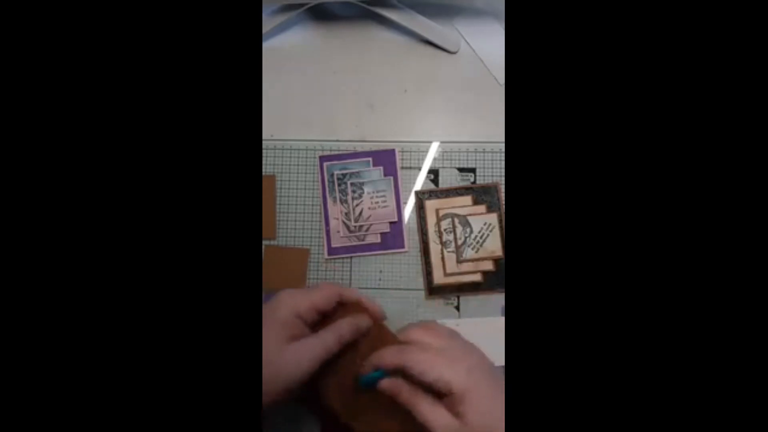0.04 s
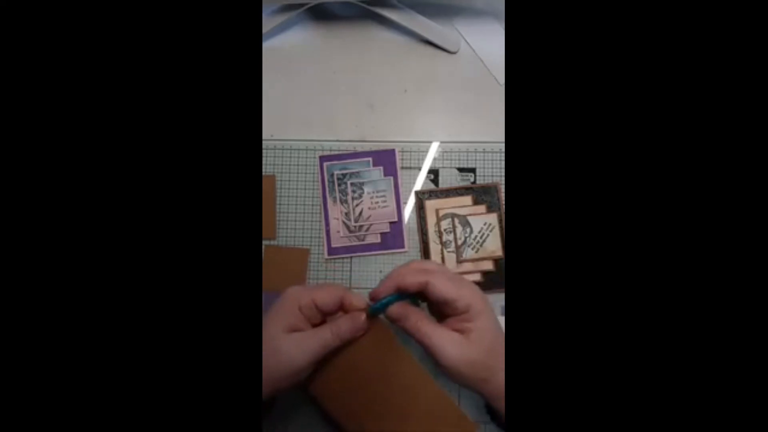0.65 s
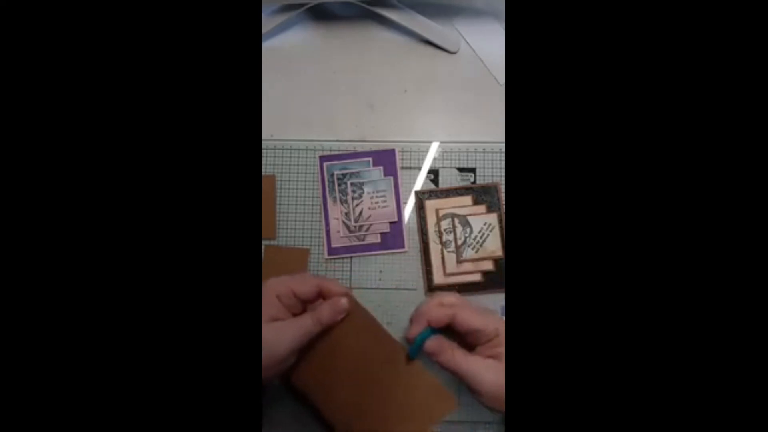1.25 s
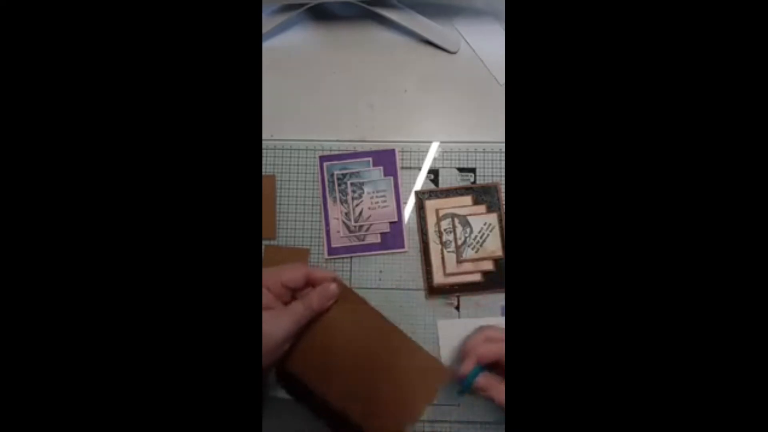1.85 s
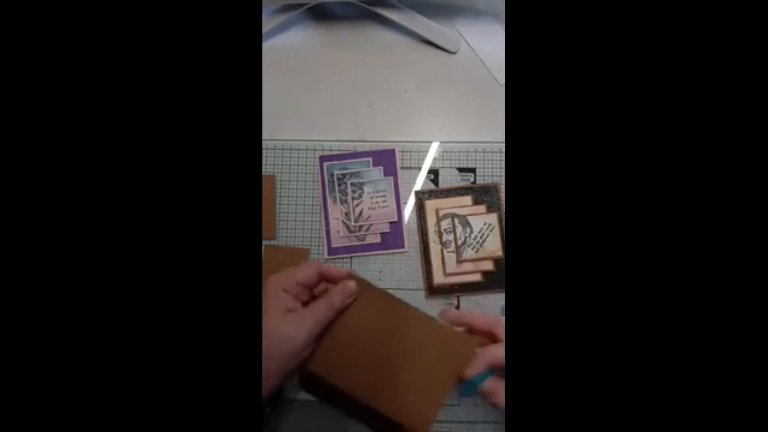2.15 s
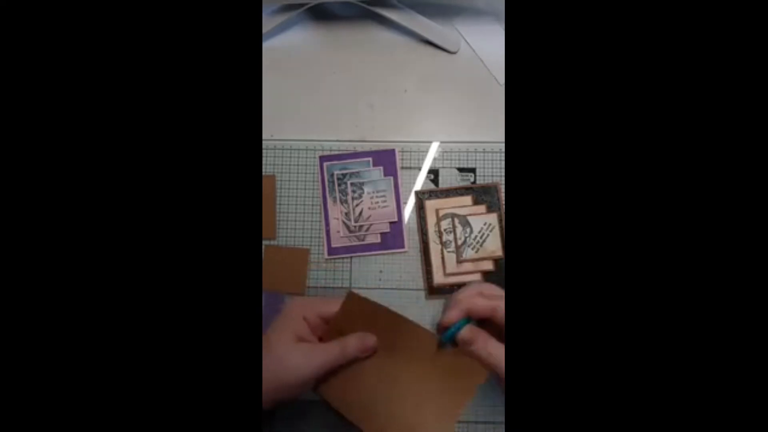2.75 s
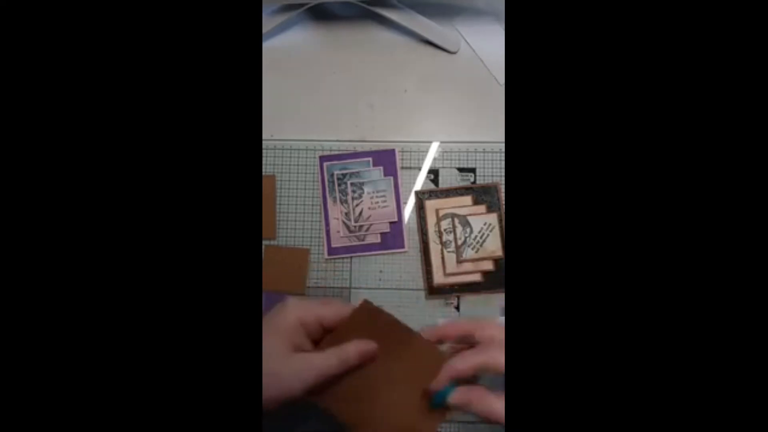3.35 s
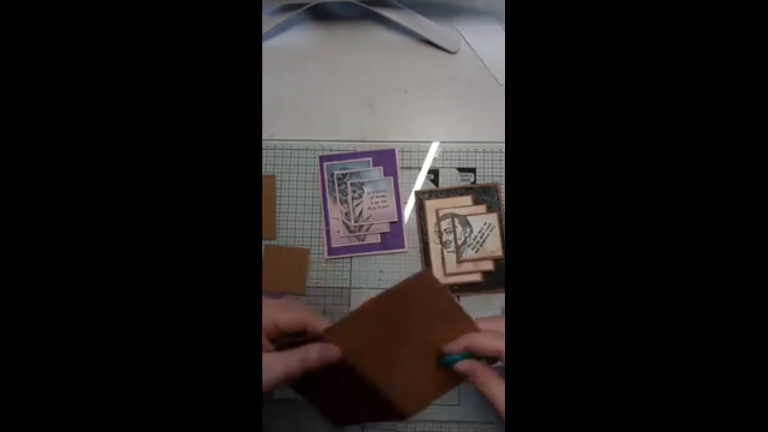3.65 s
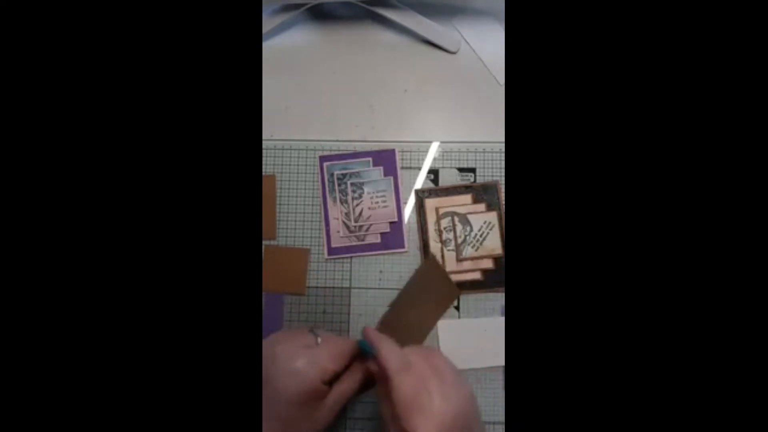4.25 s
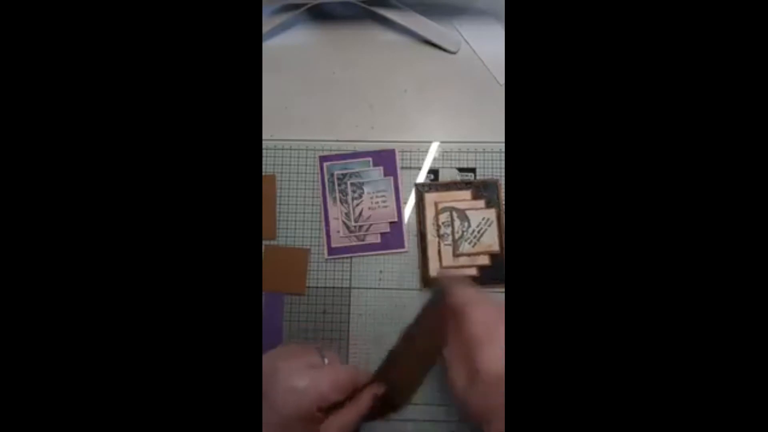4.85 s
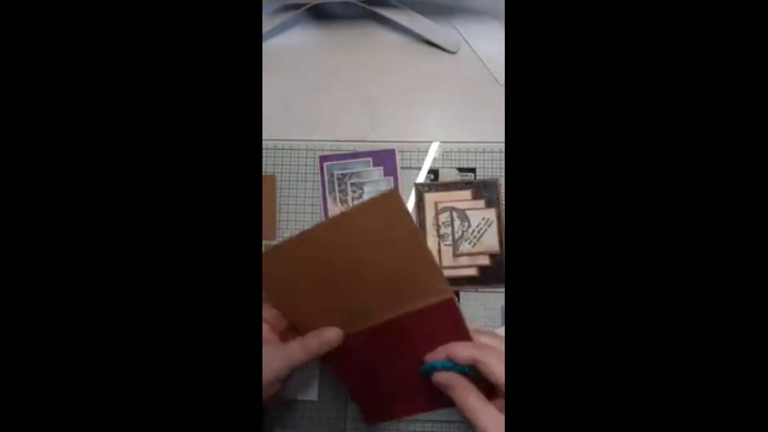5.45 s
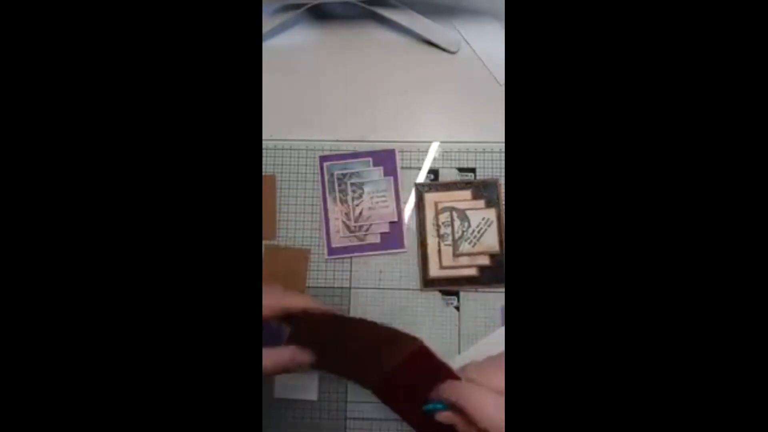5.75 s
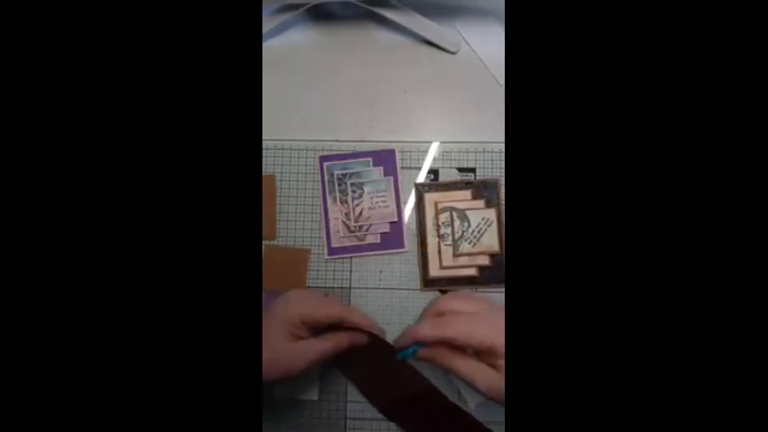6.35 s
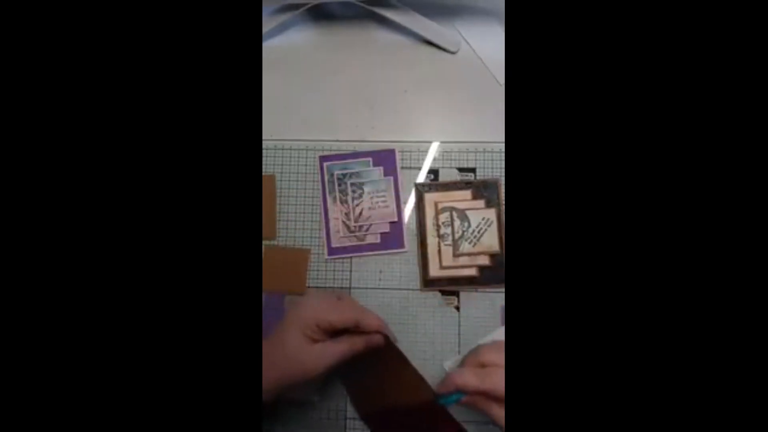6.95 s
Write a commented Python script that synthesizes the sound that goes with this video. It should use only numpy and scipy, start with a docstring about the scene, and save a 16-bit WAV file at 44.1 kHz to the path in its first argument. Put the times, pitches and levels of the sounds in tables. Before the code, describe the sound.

A small blade rasps along the edge of a card in short strokes, with paper sliding, tapping and brief squeaks between them.

```python
"""A craft table in a small room, one close microphone over faint room air.
A paper distresser's blade rasps along the edge of a folded card in short strokes: it catches and
tears fibres at an uneven rate, and the card radiates each slip. Between strokes the card hisses
through the fingers and over the mat, squeaks briefly, and is tapped and flicked."""
import sys
import numpy as np
from scipy import signal
from scipy.fft import rfft, irfft, next_fast_len
from scipy.io import wavfile
from scipy.ndimage import map_coordinates

SR = 44100
rng = np.random.default_rng(int(sys.argv[2]) if len(sys.argv) > 2 else 0)


def master(y):
    """Save y as 16-bit WAV."""
    cut = np.clip(np.atleast_2d(y).T, -1, 1)
    pcm = np.round(cut * 32767)  # scale
    wavfile.write(sys.argv[1], SR, pcm.astype(np.int16))


N = 312603
TIME = np.arange(N) / SR
EDGE_DB = 20  # level spanned by the rise or fall of a stroke or slide


def amp(db):
    """Decibels to gain."""
    return 10 ** (np.asarray(db) / 20)


def unit(x):
    """x at rms 1."""
    return x / np.sqrt(np.mean(x ** 2) + 1e-20)


def along(points, hz):
    """(f/Hz, value) points read on a log frequency axis."""
    f, v = np.transpose(points)
    return np.interp(np.log(hz + 1), np.log(f + 1), v)


def band(hz, lo_hz, hi_hz, order=8):
    """Gain of a band with soft edges."""
    return ((1 + (lo_hz / (hz + 1)) ** order) * (1 + (hz / hi_hz) ** order)) ** -.5


def wobble(rate):
    """A smooth random curve, rate knots a second."""
    return map_coordinates(rng.standard_normal(int(N * rate / SR) + 4), [TIME * rate])


def coloured(x, gain):
    """x through a minimum-phase filter whose gain is a function of frequency."""
    n = x.shape[-1]
    m = 2 * next_fast_len(n // 2 + SR // 16)
    hz = np.fft.rfftfreq(m, 1 / SR)
    cepstrum = irfft(np.log(np.maximum(gain(hz), 1e-6)))
    cepstrum[1:m // 2] *= 2
    cepstrum[m // 2 + 1:] = 0
    return irfft(rfft(x, m) * np.exp(rfft(cepstrum)), m)[..., :n]


def air():
    """Room tone: a faint steady noise behind everything."""
    # spectrum of the room tone: f/Hz, relative level/dB
    spectrum = [(20, -25), (40, -6), (62, -3.5), (110, 5), (200, -12), (380, -1), (550, -10.5), (850, -6.5),
                (1300, -17.5), (2600, -14.5), (4500, -11.5), (8000, -19.5), (14000, -11.5)]
    return amp(-62.5) * unit(coloured(rng.standard_normal(N), lambda hz: amp(along(spectrum, hz))))


def room(x, early_db, early_t60, tail_db):
    """The table and near things scatter the sound at once; the walls answer with a short tail."""
    # reverberation time of the room: f/Hz, t60/s
    decay_times = [(150, 0.51), (450, 0.25), (1000, 0.32), (2800, 0.29), (7000, .28), (14000, 0.19)]
    hz, t, noise = signal.stft(rng.standard_normal(SR // 2), SR, nperseg=256)
    decay = amp(-60 * t / along(decay_times, hz)[:, None])
    tail = signal.istft(noise * decay, SR, nperseg=256)[1]
    t = np.arange(len(tail)) / SR
    tail *= np.clip(t / .012, 0, 1)
    early = rng.standard_normal(len(t)) * amp(-60 * t / early_t60) * (t > .002)
    response = amp(early_db) * early / np.linalg.norm(early) + amp(tail_db) * tail / np.linalg.norm(tail)
    return x + signal.fftconvolve(x, response)[:N]


def card(hz):
    """Gain of the held card: resonances standing on its broad colour."""
    # broad colour of the card: f/Hz, gain/dB
    colour = [(30, -31.5), (100, -16), (240, -4), (450, -0.5), (900, 0), (1080, -11), (1400, -5),
              (2700, -11), (3100, -10.5), (4700, -11.5), (6800, -18), (15000, -26)]
    # its resonances: f/Hz, width/Hz, peak relative to the colour/dB
    modes = [(450, 330, -10), (583, 38, -3), (850, 52, -11), (1590, 73, -18.5), (2650, 240, 2.5),
             (3827, 150, 2), (4610, 160, -2), (6550, 550, -1)]
    peaks = sum(amp(db) / (1 + (2 * (hz - centre) / width) ** 2) for centre, width, db in modes)
    return amp(along(colour, hz)) * (1 + peaks)


def bent(x, delay_s):
    """Bending waves in card are dispersive: treble arrives first, 1 kHz after delay_s, bass later."""
    m = next_fast_len(len(x) + SR // 16)
    phase = 4 * np.pi * delay_s * np.sqrt(1000 * np.fft.rfftfreq(m, 1 / SR))
    return irfft(rfft(x, m) * np.exp(-1j * phase), m)[:len(x)]


def gripped(x):
    """Each grip leaves part of the sheet free to ring at two pitches; the fingers shade its treble."""
    # grips: from t/s, to t/s, low ring f/Hz, boost/dB, high ring f/Hz, boost/dB, treble gain/dB
    grips = [(0.137, 0.214, 440, 4.5, 4670, 2.5, 1.5), (1.005, 1.26, 620, 1.5, 2570, 3.5, -1),
             (1.318, 1.467, 830, 3, 2630, 4, -0.5), (1.526, 1.893, 740, 2, 2480, 5, 1.5),
             (1.914, 1.957, 961, 6, 1384, 14, 3), (2.248, 2.274, 247, 2, 494, 21, -1),
             (2.505, 2.523, 238, 12, 480, 3, -4), (2.787, 2.85, 601.5, 0.5, 1900, 9, -3.5),
             (2.876, 3.19, 493, 6, 1670, 7, 2), (4.245, 4.569, 388.1, 6.5, 1376, 6, -2),
             (4.61, 4.84, 161, 6, 2051, 3.5, -4.5), (4.851, 5.04, 607, 1, 4428, 4.5, -5.5),
             (6.824, 6.959, 196.6, 9.5, 880.6, 8, 2)]
    low_q, high_q, treble_hz = 4.4, 10.7, 4500
    out = x.copy()
    for start, end, low_hz, low_db, high_hz, high_db, treble_db in grips:
        near = (TIME > start - .02) & (TIME < end + .05)
        inside_s = np.minimum(TIME[near] - start, end - TIME[near])
        piece = x[near] * np.clip(inside_s / .01 + .5, 0, 1)  # 10 ms crossfades
        rung = coloured(piece, lambda hz: amp(treble_db * band(hz, treble_hz, SR, order=16)))
        for hz, q, boost_db in [(low_hz, low_q, low_db), (high_hz, high_q, high_db)]:
            rung += (amp(boost_db) - 1) * signal.lfilter(*signal.iirpeak(hz, q, SR), piece)
        out[near] += unit(rung) * piece.std() - piece  # the colour changes, the level stays
    return out


def slips(rate, scatter_db, crumble, crumble_s):
    """Stick-slip force: rate jerks a second at uneven gaps, each with a crumble of tearing fibres."""
    rate = np.maximum(rate, 1) * np.ones(N)
    catches = np.cumsum(rng.gamma(4, .25, 30000))
    at = np.searchsorted(np.cumsum(rate) / SR, catches)
    at = at[at < N]
    scatter = amp(scatter_db * np.clip(rng.standard_normal(len(at)), -2, 1.5))
    jerks = np.bincount(at, scatter / np.sqrt(rate[at]), N)  # rare slips are larger
    fading = signal.lfilter([1], [1, -np.exp(-1 / (crumble_s * SR))], jerks)
    snaps = unit(jerks * rng.choice([-1, 1], N))
    tearing = unit(fading * rng.standard_normal(N))
    return unit(snaps + crumble * tearing)


def patchy(x, depth_db, patch_hz, patch_s):
    """The colour drifts in small patches as the points of contact wander over the sheet."""
    hz, t, spectrum = signal.stft(x, SR, nperseg=512)
    where = np.meshgrid(hz / patch_hz, t / patch_s, indexing="ij")
    drift = map_coordinates(rng.standard_normal((230, 720)), where, order=1)
    return signal.istft(spectrum * amp(depth_db * drift), SR, nperseg=512)[1][:N]


def slide_gains():
    """Gains of hiss and drag: each slide gathers speed and comes to rest."""
    # slides under the fingers: fastest at t/s, rise/s, fall/s, hiss level/dB, drag level/dB
    slides = [(.03, 0.75, 0.35, -44, -49), (0.181, 0.051, 0.054, -34.5, -47), (.29, 0.046, 0.062, -58, -61),
              (0.399, 0.069, 0.075, -47.5, -56.5), (.95, 0.21, 0.12, -61.5, -67),
              (2.17, 0.086, 0.22, -53, -58.5), (2.3, 0.061, 0.088, -47, -51), (2.44, 0.24, 0.2, -51.5, -50),
              (2.557, 0.084, 0.055, -35.5, -44.5), (2.68, 0.15, 0.13, -62.5, -62.5),
              (2.84, 0.0401, 0.099, -54.5, -57), (3.463, 0.023, 0.092, -41.5, -46.5),
              (3.58, 0.14, 0.18, -42.5, -54.5), (3.745, 0.057, 0.06, -50.5, -57),
              (3.849, 0.056, 0.034, -42, -50), (3.92, 0.046, 0.072, -54.5, -64),
              (4.145, 0.066, 0.0476, -51, -67), (4.271, 0.09, 0.11, -52.5, -55),
              (5.109, 0.082, 0.2, -43.5, -60), (5.21, 0.086, 0.27, -52, -56.5),
              (5.505, 0.016, 0.031, -46, -45.5), (5.61, 0.13, 0.18, -42, -51),
              (5.7, 0.15, 0.049, -43.5, -63), (5.87, 0.094, 0.18, -47, -53.5),
              (5.945, 0.11, 0.12, -50, -53.5), (6.32, 0.036, 0.05, -53, -72),
              (6.46, 0.021, 0.043, -58, -63), (6.644, .13, 0.18, -47, -55),
              (6.689, 0.033, 0.09, -69, -46.5), (7.075, 0.056, 0.058, -40, -42.5)]
    roundness = 1.345  # 1 = a pointed swell, 2 = a rounded one
    power = np.zeros((2, N))
    for s, rise_s, fall_s, hiss_db, drag_db in slides:
        away = np.maximum((s - TIME) / rise_s, (TIME - s) / fall_s)
        near = away < 3
        drop_db = EDGE_DB * away[near] ** roundness
        power[:, near] += amp([hiss_db - drop_db, drag_db - drop_db]) ** 2
    return np.sqrt(power)


def sliding():
    """Paper grain hisses under the fingers while the sheet drags softly on the mat."""
    # spectrum of skin and mat rubbing on paper: f/Hz, relative level/dB
    rub = [(30, -13), (120, -6.5), (380, 0), (650, -5.5), (860, 0.5), (1080, -7.5), (1800, -2.5), (2700, 1),
           (3400, -1), (4500, 1.5), (5600, -2), (6800, -2), (8500, -12), (14000, -6)]
    hiss_gain, drag_gain = slide_gains()
    grain = slips(rate=2000, scatter_db=.5, crumble=1.34, crumble_s=.0028)
    grain *= amp(1.7 * wobble(rate=70))  # the level flickers
    grain = patchy(grain, depth_db=3, patch_hz=400, patch_s=.05)
    hiss = unit(coloured(grain, lambda hz: amp(along(rub, hz)) * band(hz, 1700, 18000)))
    drag = unit(coloured(grain, lambda hz: amp(along(rub, hz)) * band(hz, 25, 1440)))
    return hiss_gain * hiss + drag_gain * drag


def squeaks():
    """Friction sings in one narrow band, starts at once and fades."""
    # squeaks of the paper: t/s, length/s, f/Hz, level/dB
    events = [(0.783, .03, 4400, -56.5), (1.499, 0.073, 3350, -47), (2.376, 0.073, 4020, -39),
              (7.029, 0.028, 6550, -34)]
    q, attack_s, fade_db = 6.6, .0043, 13
    out = np.zeros(N + SR)
    t = np.arange(SR // 4) / SR
    for s, length_s, hz, db in events:
        tone = unit(signal.lfilter(*signal.iirpeak(hz, q, SR), rng.standard_normal(len(t))))
        envelope = np.minimum(t / attack_s, 1) * amp(db - fade_db * t / length_s)
        out[round(s * SR):][:len(t)] += tone * envelope
    return out[:N]


def blow(lo_hz, hi_hz, flutter, t60):
    """One band of a blow on the card: a jerk and the sheet's dying flutter."""
    t = np.arange(SR // 8) / SR
    jerk = unit(1. * (t == 0))
    shaking = unit(rng.standard_normal(len(t)) * amp(-60 * t / t60))
    ring = coloured(jerk + flutter * shaking, lambda hz: card(hz) * band(hz, lo_hz, hi_hz, order=4))
    ring = bent(ring, delay_s=.0018)
    return unit(ring) * np.sqrt(SR / 100 / len(t))  # the energy of 10 ms at rms 1


def taps():
    """The blade snags, or the card is tapped and flicked: a thud, a papery knock and a dry click."""
    # blows on the card: t/s, thud level/dB, knock level/dB, click level/dB
    blows = [(.199, -70, -35.5, -38), (0.223, -41.5, -47, -41.5), (0.957, -68, -53, -52),
             (1.005, -63, -43.5, -47), (1.017, -57, -41, -43), (1.029, -57, -41, -50),
             (1.056, -56, -33, -41), (1.315, -67, -52, -59), (1.531, -40, -42, -43.5),
             (1.557, -56, -37, -39), (1.631, -54, -24.5, -32.5), (1.838, -32, -27, -49),
             (1.916, -55, -27.5, -33.5), (2.258, -42, -43.5, -45), (2.285, -54, -43.5, -44.5),
             (2.379, -62, -55, -48), (2.487, -39, -50, -44), (2.807, -61, -34.5, -45.5),
             (2.886, -70, -46.5, -50.5), (3.026, -49, -33, -36.5), (3.132, -34, -20, -27),
             (3.444, -69, -46, -39), (3.487, -37.5, -43.5, -45), (3.728, -75, -42.5, -46),
             (3.849, -50, -41, -41.5), (4.254, -56, -48, -42), (4.266, -58, -43, -31.5),
             (4.381, -62, -40, -58), (4.64, -52, -40, -46), (4.868, -54, -46, -57), (4.887, -44, -38, -46),
             (4.961, -45, -36, -24), (5.499, -59, -40.5, -39), (5.969, -44, -44.5, -44),
             (6.442, -65, -60.5, -77), (6.671, -39, -42, -52.5), (6.682, -44, -42.5, -61),
             (6.835, -69, -56, -46), (6.859, -39, -33.5, -44), (7.031, -53, -58, -44.5),
             (7.068, -36.5, -35, -41.5)]
    out = np.zeros(N + SR)
    for s, thud_db, knock_db, click_db in blows:
        thud = amp(thud_db) * blow(80, 290, flutter=.95, t60=.04)
        knock = amp(knock_db) * blow(380, 1800, flutter=.55, t60=.05)
        click = amp(click_db) * blow(1900, 5600, flutter=1.3, t60=.025)
        out[round(s * SR):][:len(thud)] += thud + knock + click
    return out[:N]


def stroke_gains():
    """Gains of body, rasp and fizz: each stroke bites, holds as level and colour shift, and lets go."""
    # blade strokes: full bite at t/s, attack/s, hold/s, body level/dB, rasp level/dB, fizz level/dB,
    # swell over the hold/dB, brightening over the hold/dB
    strokes = [(1.057, .042, .14, -33.5, -34.5, -38.5, -4, 3), (1.337, .022, 0.084, -37, -41, -43, -1, 3),
               (1.57, 0.041, .06, -33.5, -34, -40, 5, -3), (1.658, .03, 0.099, -34.5, -34.5, -42.5, 0, -2),
               (1.758, 0.024, 0.077, -30, -32.5, -30, -5, 9), (2.89, 0.028, .035, -53.5, -54.5, -54, -3, 2),
               (2.97, 0.045, 0.048, -54.5, -49, -47.5, 1, 0),
               (3.044, 0.042, 0.08, -36.5, -34, -33.5, 10, -1), (4.259, 0.0084, .008, -43, -45, -42, 2, 6),
               (4.387, .022, .028, -42.5, -42, -47, 0, 0), (4.502, .03, .03, -45.5, -45, -50, 0.5, 0),
               (4.642, .011, 0.049, -35, -37.5, -43, -3, -1), (4.765, .03, 0.037, -38, -46.5, -47, -1, -3),
               (4.899, .04, .07, -32.5, -31, -32.5, 3, 13),
               (6.865, 0.021, 0.042, -35.5, -34.5, -40, -2.5, 3)]
    release_s = .052
    power = np.zeros((3, N))
    for s, attack_s, hold_s, body_db, rasp_db, fizz_db, swell_db, brightening_db in strokes:
        travel = np.clip((TIME - s) / hold_s, 0, 1) - .5
        edges = np.maximum(s - TIME, 0) / attack_s + np.maximum(TIME - s - hold_s, 0) / release_s
        near = edges < 4
        for layer, (db, tilt) in enumerate([(body_db, -.5), (rasp_db, -.1), (fizz_db, .5)]):
            slope_db = swell_db + tilt * brightening_db
            power[layer, near] += amp(db + slope_db * travel[near] - EDGE_DB * edges[near]) ** 2
    return np.sqrt(power)


def blade():
    """Coarse slips shake the card and rasp; a faster stroke slips more often and fizzes with tears."""
    body_gain, rasp_gain, fizz_gain = stroke_gains()
    speed = fizz_gain / fizz_gain.max()
    coarse = slips(rate=200 + 540 * speed, scatter_db=3.6, crumble=.8, crumble_s=.0012)
    coarse = bent(coarse, delay_s=.0012)
    fine = slips(rate=1800, scatter_db=.5, crumble=1, crumble_s=.00025)
    force = coarse + .42 * fine
    body = unit(coloured(force, lambda hz: card(hz) * band(hz, 55, 1165)))
    rasp = unit(coloured(force, lambda hz: card(hz) * band(hz, 1150, 2700)))
    fizz = unit(coloured(coarse + 1.6 * fine, lambda hz: card(hz) * band(hz, 3240, 18000)))
    return body_gain * body + rasp_gain * rasp + fizz_gain * fizz


def scene():
    """Blade, card and fingers close up, in mono, with the room well behind them."""
    paper = gripped(blade() + sliding() + taps()) + squeaks()
    heard = room(paper, early_db=-10, early_t60=.07, tail_db=-12.5)
    return (heard + air())[None]


def record(dry):
    """The microphone dulls the top octave and keeps nothing above its band limit."""
    # microphone response, a step down in the treble: f/Hz, gain/dB
    response = [(6850, -2.5), (7250, -12)]
    limit_hz = 15100
    dull = coloured(dry, lambda hz: amp(along(response, hz)))
    m = next_fast_len(N + SR // 2)
    passband = np.fft.rfftfreq(m, 1 / SR) < limit_hz
    return irfft(rfft(dull, m) * passband, m)[..., :N]


dry = scene()
out = record(dry)
master(out)
```